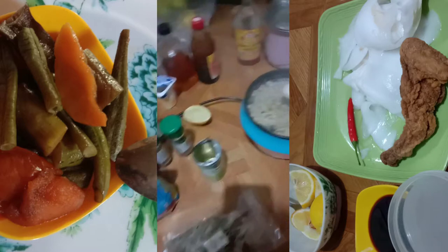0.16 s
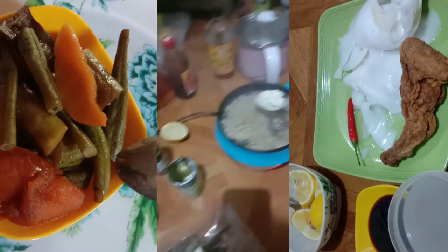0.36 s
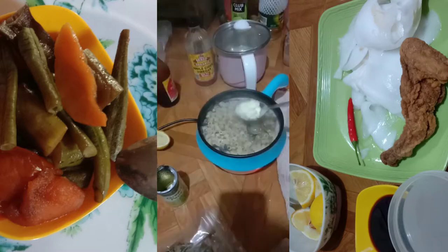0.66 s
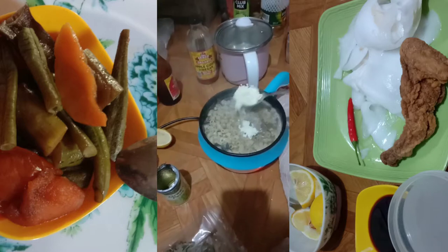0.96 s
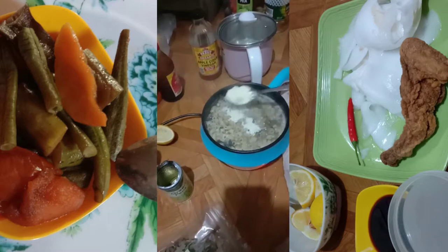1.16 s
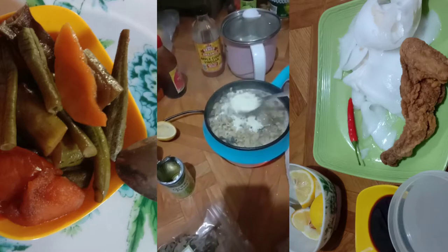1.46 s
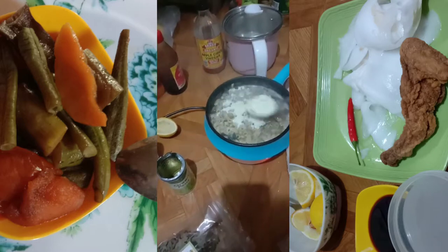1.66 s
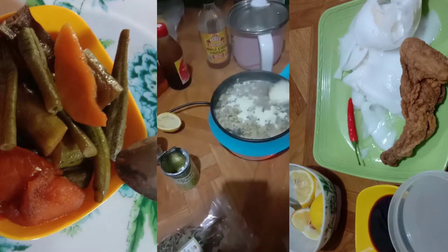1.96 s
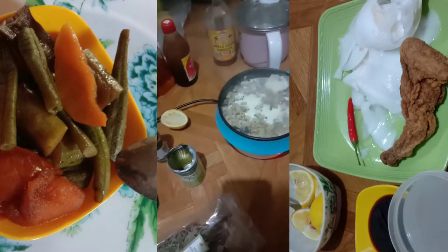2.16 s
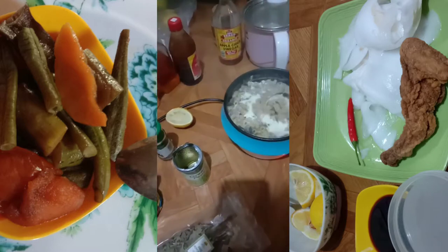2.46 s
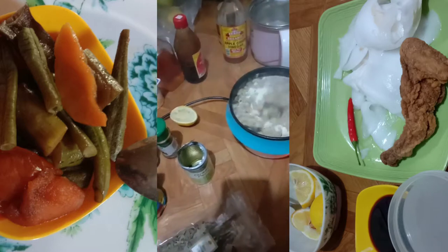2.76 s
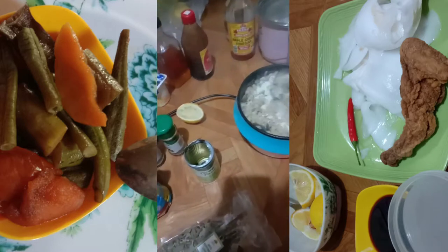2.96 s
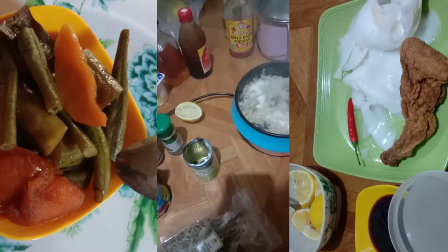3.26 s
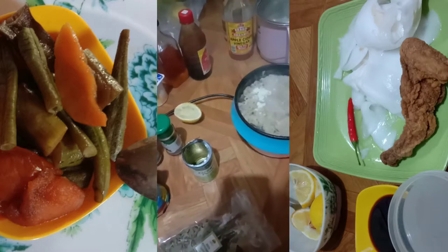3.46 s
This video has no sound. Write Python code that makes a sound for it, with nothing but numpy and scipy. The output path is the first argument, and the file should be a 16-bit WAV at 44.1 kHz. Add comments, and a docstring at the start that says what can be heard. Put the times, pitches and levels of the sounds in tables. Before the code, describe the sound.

Close by in a small kitchen, boiling soup bubbles and spits over a faint fizz. Near the end a spoon clinks against the metal pot two times, the second louder, and the soup keeps bubbling.

```python
"""A thick soup boils in a small metal pot on a kitchen table, heard from close by.
From the start, over a faint hum and a restless fizz, it heaves in short surges: bubbles pop,
froth squelches, droplets spit and big bubbles glug. After about 2.3 seconds the boil eases.
Near 2.7 and 3.2 seconds a spoon knocks on the pot, which rings and thumps the table.
The soup bubbles on to the end, and the small room answers with a short echo."""
import sys
import numpy as np
from scipy import signal
from scipy.fft import rfft, irfft, next_fast_len
from scipy.io import wavfile
from scipy.ndimage import map_coordinates

SR = 44100
rng = np.random.default_rng(int(sys.argv[2]) if len(sys.argv) > 2 else 0)


def inscribe(sig):
    """Save sig as 16-bit PCM at rate SR to the path in sys.argv[1].

    A 1-D sig is mono; a 2-D sig holds one channel per row.
    Samples are clipped to [-1, 1] before scaling.
    """
    pcm = np.round(np.clip(np.atleast_2d(sig).T, -1, 1) * 32767)
    wavfile.write(sys.argv[1], SR, pcm.astype(np.int16))


N = 158760  # 3.6 seconds


def amp(db):
    """Turn decibels (dB) into a factor to multiply by."""
    return 10 ** (np.asarray(db) / 20)


def unit(x):
    """Scale a sound to an average strength (rms) of 1."""
    return x / np.sqrt(np.mean(x ** 2) + 1e-20)


def along(points, hz):
    """Read between (Hz, value) points, with the octaves evenly spaced."""
    freqs, values = np.transpose(points)
    return np.interp(np.log(hz + 1), np.log(freqs + 1), values)


def wobble(rate):
    """A smooth random curve through `rate` points a second."""
    return map_coordinates(rng.standard_normal(4096), [np.arange(N) * rate / SR], mode="wrap")


def add(track, start, sound):
    """Mix a sound in at a start time in seconds."""
    part = track[max(round(start * SR), 0):][:len(sound)]
    part += sound[:len(part)]


def colour(x, points):
    """Turn frequencies up or down along a curve of (Hz, dB) points."""
    size = 2 * next_fast_len(len(x) // 2 + 2048)
    cepstrum = irfft(along(points, np.fft.rfftfreq(size, 1 / SR)) * np.log(10) / 20)
    cepstrum[1:size // 2] *= 2  # folded so that the filter never rings ahead of the sound
    cepstrum[size // 2 + 1:] = 0
    return irfft(rfft(x, size) * np.exp(rfft(cepstrum)))[:len(x)]


def swell(t, length, rise_s, fall_s):
    """A loudness curve that rises, holds until `length` seconds and dies away."""
    return np.minimum(t / rise_s, 1) * np.exp(-np.maximum(t - length, 0) / fall_s)


def grainy(t, depth_db, rate):
    """Noise whose level flickers quickly, so it sounds rough."""
    return rng.standard_normal(len(t)) * amp(depth_db * wobble(rate)[:len(t)])


def blip(t, hz, cycles):
    """A bubble's short ring: loudest after `cycles` waves, climbing in pitch as it bursts."""
    age = t * hz / cycles
    climb = 1 + 0.0045 * np.minimum(age, 10)
    return (age * np.exp(1 - age)) ** 2 * np.sin(2 * np.pi * hz * t * climb)


def ring(t, notes, rise_s, vary_db=0):
    """A struck object rings with several notes; each drops 60 dB in its fade time."""
    out = np.zeros(len(t))
    for k, (hz, db, fade_s) in enumerate(notes):
        loudness = amp(db + vary_db * rng.normal() - 60 * t / fade_s)
        out += (-1) ** k * loudness * np.sin(2 * np.pi * hz * t)
    return out * (1 - np.exp(-t / rise_s))


def widen(x):
    """Left and right sound nearly the same, except in the top treble, where they differ; each microphone hisses
    faintly."""
    # Each row: frequency in Hz, level of the left-right difference in dB.
    width = [(25, -33), (70, -34), (130, -38), (300, -40), (3500, -48.5), (4400, -33), (5400, -24.5),
             (6800, -36), (8500, -9.5), (12000, -9), (15000, -17)]
    # Each row: frequency in Hz, boost or cut of the hiss in dB.
    hiss_tone = [(25, 19), (120, 15), (400, 9), (2000, 15), (6000, 7), (9000, 2.5), (15500, 7)]
    spectrum = signal.stft(x, nperseg=128)[2]
    scrambled = 2 * spectrum * np.exp(2j * np.pi * rng.random(spectrum.shape))
    side = colour(signal.istft(scrambled, nperseg=128)[1][:N], width)
    hiss = np.array([unit(colour(rng.standard_normal(N), hiss_tone)) for _ in range(2)])
    return np.array([x + side, x - side]) + amp(-76.5) * hiss


def kitchen(x):
    """Quick reflections come from the pot wall and the table, then a short echo from the room."""
    # Each row: frequency in Hz, seconds for the room's echo to fade by 60 dB.
    room_fade = [(100, 0.075), (1000, 0.23), (6000, 0.12), (14000, 0.11)]
    early_db, early_fade_s, room_db = -7.5, 0.026, -10
    out, step = np.zeros(N), SR // 5
    for i in range(0, N, step):  # a new random echo for each fifth of a second
        hz, t, noise = signal.stft(rng.standard_normal(SR // 3), SR, nperseg=256)
        tail = signal.istft(noise * amp(-60 * t / along(room_fade, hz)[:, None]), SR, nperseg=256)[1]
        t = np.arange(len(tail)) / SR
        early = rng.standard_normal(len(t)) * amp(-60 * t / early_fade_s) * (t > .001)
        echo = amp(early_db) * early / np.linalg.norm(early) + amp(room_db) * tail / np.linalg.norm(tail)
        add(out, i / SR, signal.fftconvolve(x[i:i + step], echo))
    return x + out


def hum():
    """Faint low tones that waver and burble."""
    # Each row: start and end in seconds, pitch in Hz, level in dB.
    tones = [(0, 3.6, 84.5, -71), (0, 3, 122, -67), (3.2, 3.6, 134.4, -56)]
    out, t = np.zeros(N), np.arange(N) / SR
    for start, end, hz, db in tones:
        fade = np.clip(np.minimum(t - start, end - t) / 0.027 + 1, 0, 1)
        waver = 1.2 + wobble(22) + 1j * wobble(22)  # shakes both loudness and pitch
        out += fade * amp(db) * unit(np.real(waver * np.exp(2j * np.pi * hz * t)))
    return out


def simmer():
    """The soup fizzes in little clusters and rolls with a low rumble; both sink in the lulls."""
    # Each row: time in seconds, fizz level in dB, rumble level in dB.
    strength = [(0, -59.5, -63), (.8, -63, -62.5), (1.5, -59, -63), (2.25, -65, -62), (2.37, -60.5, -67.5),
                (2.5, -64, -66), (2.6, -60, -58), (2.87, -57, -60.5), (2.97, -60.5, -69), (3.11, -59, -72),
                (3.22, -52.5, -65.5), (3.6, -64, -56.5)]
    # Each row of both: frequency in Hz, boost or cut in dB.
    fizz_tone = [(25, -14), (50, -11.5), (85, -5.5), (130, 15), (180, -1.5), (300, -1), (500, -12),
                 (950, -14), (1350, -1.5), (1900, -8), (2700, -15.5), (3500, -10), (4400, -16.5),
                 (5600, -8), (6800, -19), (8200, -37), (13000, -37), (15300, -22)]
    rumble_tone = [(40, -44), (70, 3), (120, -2), (170, 1.5), (280, 2), (400, -3), (520, -16.5),
                   (800, -18.5), (1500, -40)]
    times, *levels = np.transpose(strength)
    fizz_db, rumble_db = [np.interp(np.arange(N) / SR, times, db) for db in levels]
    crackle_db = 3.5 * wobble(330) + 2.5 * wobble(34)  # fine grains, slower clusters
    fizz = unit(colour(rng.standard_normal(N) * amp(crackle_db), fizz_tone))
    rumble = unit(colour(rng.standard_normal(N), rumble_tone))
    return fizz * amp(fizz_db + 0.85 * wobble(6.9)) + rumble * amp(rumble_db + 3.6 * wobble(20))


def spray():
    """Tiny droplets spatter in soft, bright puffs."""
    # Each row: start and length in seconds, level in dB.
    puffs = [(0.162, 0.0071, -50), (1.453, 0.017, -55), (1.666, 0.022, -57.5), (1.821, 0.02, -50.5),
             (1.865, 0.0061, -53), (1.97, .014, -51.5), (2.002, 0.0046, -44.5), (2.04, 0.0064, -54),
             (2.178, 0.0095, -61)]
    # Each row: frequency in Hz, boost or cut in dB.
    tone = [(2000, -23), (3500, 1), (4400, 7), (5500, 4.5), (6800, 10.5), (7400, -9), (8200, -17),
            (13000, -26.5), (15000, -15)]
    out, t = np.zeros(N), np.arange(SR // 12) / SR
    for start, length, db in puffs:
        droplets = unit(colour(grainy(t, depth_db=7.5, rate=590), tone))
        add(out, start, amp(db) * droplets * swell(t, length, rise_s=0.0018, fall_s=0.0039))
    return out


def squelch():
    """Steam and stirring squeeze froth through the thick soup: a short rough hiss round one pitch."""
    # Each row: start and length in seconds, level in dB, centre pitch in Hz.
    squelches = [(0.058, 0.054, -46, 3070), (0.339, 0.0069, -39.5, 3900), (0.398, 0.02, -44, 3480),
                 (0.562, 0.052, -50.5, 2910), (0.704, 0.051, -52.5, 3000), (0.793, 0.013, -61, 3100),
                 (0.896, 0.012, -49.5, 3270), (1.027, 0.11, -56, 3140), (1.14, 0.0071, -36, 3600),
                 (1.225, 0.016, -44, 3170), (1.288, 0.016, -45.5, 3150), (1.397, 0.059, -48, 2860),
                 (1.979, 0.015, -40, 4160), (2.618, 0.01, -39.5, 4660), (2.093, 0.013, -50, 3400),
                 (3.21, 0.019, -48, 3250), (3.394, 0.045, -63, 4800)]
    out, t = np.zeros(N), np.arange(SR // 8) / SR
    octaves = np.linspace(-3, 3, 25)
    band_db = np.maximum(-4 * (octaves / 0.32) ** 2, -45)
    for start, length, db, hz in squelches:
        band = np.transpose([hz * 2 ** octaves, band_db])
        froth = unit(colour(grainy(t, depth_db=7.5, rate=490), band))
        add(out, start, amp(db) * froth * swell(t, length, rise_s=0.0029, fall_s=0.0073))
    return colour(out, [(6800, -2.5), (7900, -30)])


def glugs():
    """Large bubbles heave up from the bottom of the pot, each with a short low note."""
    # Each row: start in seconds, level in dB, pitch in Hz.
    bubbles = [(0.144, -36, 221), (0.221, -35, 298), (0.342, -38, 256), (.402, -34.5, 315),
               (.715, -41.5, 169), (1.013, -38, 283), (1.11, -37.5, 150), (1.502, -38.5, 297),
               (1.572, -38, 260), (1.677, -34, 291), (2.528, -38.5, 231), (2.695, -40, 214),
               (3.254, -42, 128), (3.397, -38, 290), (3.457, -42, 224)]
    out, t = np.zeros(N), np.arange(SR // 8) / SR
    for start, db, hz in bubbles:
        add(out, start, amp(db - 5) * blip(t, hz, cycles=1.97))
    return out


def spoon():
    """A spoon chatters against the pot, which rings and thumps the table; then it briefly scrapes."""
    # Each row: start in seconds, level in dB, brightness (each step tips the tone up by 4 dB),
    # scrape level against the knock in dB, scrape length in seconds.
    knocks = [(2.7329, -14, 1.1, -20, 0.042), (3.1632, -8.5, 2.2, -29.5, 0.021)]
    # The notes of pot and spoon, and of the table. Each row: pitch in Hz, level in dB, fade in seconds.
    pot_notes = [(532, -21.5, 0.052), (1250, -19, 0.046), (1390, -31, .09), (1570, -29, 0.03),
                 (1860, -16.5, 0.021), (1965, -33, 0.073), (2400, -14, 0.021), (2690, -9.5, 0.014),
                 (2970, -29, 0.13), (3430, -6, 0.011), (5310, -10.5, 0.011), (5840, -16.5, 0.01),
                 (6350, -40.5, .085), (6660, -13, 0.0088)]
    table_notes = [(135, -27, 0.05), (226, -27.5, 0.1), (294, -18.5, 0.064), (363, -12, 0.065),
                   (630, -16.5, 0.045), (720, -18.5, 0.022), (882, -20, 0.068)]
    # The spoon's bounces. Each row: seconds after the blow, level in dB.
    chatter = [(0, -6), (.0011, 5), (.0032, -10)]
    # Each row of both: frequency in Hz, boost or cut in dB.
    crack_tone = [(100, -17), (400, -0.5), (2000, 6), (3600, 1.5), (4500, 0), (5500, -19), (7000, -8),
                  (7500, -10.5), (8100, -25.5), (13000, -32.5), (15500, -21)]
    scrape_tone = [(150, -11), (700, -9.5), (1400, 5), (2300, -3.5), (3500, -4.5), (4500, -4.5),
                   (6500, -23), (7300, -17), (8100, -32), (13000, -23.5), (15500, -16)]
    crack_fade_s, dull_fade_s = 0.015, 0.082
    out, t = np.zeros(N), np.arange(SR // 4) / SR
    for start, db, bright, scrape_db, scrape_s in knocks:
        clang = amp(-1.5) * ring(t, pot_notes, rise_s=0.0004, vary_db=1)
        thump = ring(t, table_notes, rise_s=0.001)
        crack = rng.standard_normal(len(t)) * amp(-4.5 - 60 * t / crack_fade_s)
        for delay, bounce_db in chatter:
            add(crack, delay, amp([4 + bounce_db]))
        knock = clang + thump + colour(crack, crack_tone)
        knock = colour(knock, [(375, -2 * bright), (6000, 2 * bright)])
        rub = amp(scrape_db) * grainy(t, depth_db=5, rate=390)
        scrape = colour(rub * swell(t, scrape_s, rise_s=0.0013, fall_s=0.012), scrape_tone)
        dull = colour(scrape, [(6500, -1.5), (9000, -8)])
        scrape = dull + (scrape - dull) * amp(-60 * t / dull_fade_s)  # duller as the spoon slows
        add(out, start, amp(db) * (knock + scrape))
    return colour(out, [(30, -4), (150, 2)])


def pops():
    """Single big bubbles burst, and spatter and spoon make sharp little ticks."""
    # Each row of both: start in seconds, level in dB, pitch in Hz.
    bursts = [(.002,-20.5,1710), (0.0878,-22,2190), (0.137,-24,1900), (0.162,-21,2080), (0.2247,-15.5,1820),
              (0.246,-23,1630), (0.328,-29,1320), (0.3408,-36,1950), (0.401,-24.5,1540), (0.411,-24,2570),
              (0.421,-22,1400), (0.4354,-34,1760), (0.464,-25,1280), (0.4855,-26,1920), (0.5258,-17,1650),
              (0.541,-24,2000), (0.5613,-23,1680), (0.5903,-29,2300), (0.5994,-34,1790), (0.614,-23,1180),
              (0.7056,-22.5,1620), (0.7185,-23,1560), (0.7479,-18.5,3020), (0.7895,-18.5,1610),
              (0.893,-22.5,1600), (0.954,-34,1530), (1.0126,-21.5,1466), (1.0509,-23.5,2120),
              (1.19,-40,1330), (1.2073,-21.5,1590), (1.2553,-20,1880), (1.295,-31.5,1980),
              (1.3247,-20,1470), (1.341,-26,1330), (1.3881,-21,1850), (1.402,-16,1584), (1.5552,-23.5,1720),
              (1.6771,-23.5,1500), (1.6856,-17.5,1640), (1.7495,-36,1700), (1.856,-28,1430),
              (1.8915,-23.5,1420), (1.928,-20,1750), (1.9428,-24,1730), (1.9942,-36,1810), (2.012,-26,1440),
              (2.181,-16,3960), (2.1914,-20,1570), (2.231,-23,1530), (2.31,-71,1700), (2.424,-30.5,1435),
              (2.669,-26,1370), (2.859,-25.5,1610), (3.2966,-23.5,1630), (3.313,-33,1700),
              (3.4032,-24.5,1250)]
    ticks = [(0.1708,-25.5,5930), (0.3474,-52,5200), (0.7278,-27.5,5950), (.7452,-37,6000),
             (.7897,-40,5300), (1.1368,-37,5570), (1.1412,-34,5400), (1.4386,-29,5400), (1.5841,-26.5,5500),
             (1.9949,-28.5,5350), (2.0545,-31,4640), (2.182,-44,4540), (2.249,-26,5010), (2.7647,-34,5470),
             (2.7815,-25,6500), (2.822,-33,5450), (3.148,-31,5450), (3.1528,-27.5,5900), (3.2487,-30,4500),
             (3.2573,-29,5700), (3.296,-35,5300), (3.314,-50,4800), (3.3444,-36,5500), (3.39,-28,4900),
             (3.4061,-37,5060), (3.462,-22.5,5870)]
    snap_fade_s = 0.0015
    big, small, snaps = np.zeros((3, N))
    t = np.arange(SR // 50) / SR
    for start, db, hz in bursts:
        add(big, start, amp(db - 4.5) * blip(t, hz, cycles=0.87))
        add(big, start, amp(db - 20) * blip(t, hz * 0.903, cycles=2.9))  # the open hollow rings on
    for start, db, hz in ticks:
        add(small, start, amp(db + 1.5) * blip(t, hz, cycles=1.47))
        add(snaps, start, amp(db - 28 - 60 * t / snap_fade_s) * rng.standard_normal(len(t)))
    big = colour(big, [(200, -7), (900, -7), (1300, -0.5), (3500, -2), (5000, -2.5)])
    return colour(big + small, [(6900, 0), (8000, -20)]) + snaps


def swarm(kind, tone, rate, hz, spread, cycles, size_db, froth_db):
    """One kind of bubble in every surge: `rate` random blips a second over a little froth noise."""
    # Each row: start and length in seconds, then popping, spitting and glugging levels in dB.
    surges = [(0, 0.03, -49, -58.5, -59), (0.06, 0.081, -49.5, -68, -57.5), (0.135, 0.061, -43, -62, -53),
              (0.216, 0.042, -45, -55, -54.5), (0.329, 0.032, -43.5, -61, -54),
              (0.395, 0.04, -40.5, -58, -53), (0.453, 0.046, -45, -63, -52.5),
              (0.523, 0.027, -41.5, -99, -63), (0.564, 0.058, -42, -59.5, -55),
              (0.64, 0.049, -49, -89, -62), (0.697, 0.055, -41.5, -64, -52), (0.77, 0.034, -45, -56, -51.5),
              (0.828, 0.043, -45.5, -60, -57), (0.886, 0.033, -47.5, -67, -66),
              (0.946, 0.021, -44, -56, -55.5), (0.987, 0.076, -46, -60.5, -54.5),
              (1.103, 0.043, -45, -55.5, -54), (1.187, 0.07, -43, -61.5, -53.5),
              (1.284, 0.018, -38.5, -63.5, -50), (1.324, 0.029, -42.5, -62.5, -62),
              (1.382, 0.066, -48, -54.5, -64), (1.486, 0.046, -44.5, -66.5, -53),
              (1.547, 0.064, -47.5, -65, -54), (1.625, 0.039, -47.5, -82, -56),
              (1.667, 0.031, -43, -59, -51), (1.739, 0.066, -43, -64.5, -53),
              (1.825, 0.017, -45, -62, -47.5), (1.873, 0.09, -48, -58, -57),
              (1.972, 0.056, -46.5, -55, -57), (2.039, 0.064, -45.5, -53.5, -53),
              (2.123, 0.043, -49.5, -52.5, -54), (2.17, 0.025, -44, -55, -65),
              (2.214, 0.063, -47.5, -60, -55.5), (2.279, 0.049, -48.5, -80, -64),
              (2.378, 0.038, -57.5, -88, -56), (2.42, 0.059, -54, -65.5, -61.5),
              (2.52, 0.032, -50.5, -64, -59), (2.567, 0.068, -51, -55.5, -52.5),
              (2.663, 0.051, -51.5, -59, -54.5), (2.74, 0.039, -49, -50, -65),
              (2.829, 0.043, -49, -57.5, -55), (2.887, 0.023, -53, -65, -59),
              (3.039, 0.02, -56, -61.5, -57), (3.147, 0.02, -47, -67, -53), (3.212, 0.056, -49, -61, -51),
              (3.298, 0.065, -56.5, -54, -64.5), (3.379, 0.035, -44.5, -44.5, -63),
              (3.448, 0.026, -45, -50.5, -52), (3.489, 0.046, -50.5, -55.5, -65),
              (3.563, 0.024, -51.5, -65, -59.5)]
    rise_s, fall_s, vigorous_db = 0.006, 0.014, -43
    out, ring_t = np.zeros(N), np.arange(int(10 * cycles / hz * SR)) / SR
    for start, length, pop_db, spit_db, glug_db in surges:
        db = {"pop": pop_db, "spit": spit_db, "glug": glug_db}[kind]
        t = np.arange(int((length + rise_s + 4 * fall_s) * SR)) / SR
        when, size, height, flip = rng.random((4, max(int(rate * t[-1]), 2)))
        height = np.clip(height, .02, .98)
        pitches = hz * (height / (1 - height)) ** spread  # most lie near hz
        gains = np.sign(2 * flip - 1) * amp(size_db * size ** 2)  # a few are much louder
        bubbles = np.zeros(len(t))
        for onset, gain, pitch in zip(when * t[-1], gains, pitches):
            add(bubbles, onset, gain * blip(ring_t, pitch, cycles))
        froth = signal.fftconvolve(rng.standard_normal(len(t)), blip(ring_t, hz, cycles / 2), "same")
        surge = unit(bubbles) + amp(froth_db) * unit(froth)
        surge = colour(surge * swell(t, length, rise_s, fall_s), tone)
        if kind == "pop":  # a weak surge loses its crisp top
            surge = colour(surge, [(2100, 0), (3200, 1.2 * np.clip(db - vigorous_db, -10, 2))])
        add(out, start - rise_s / 2, amp(db) * np.sqrt(length / t[-1]) * unit(surge))
    return out


def boil():
    """Every surge pops and plinks at middle pitch, spits up high and glugs down low."""
    # Each row of all three: frequency in Hz, boost or cut in dB.
    pop_tone = [(200, -19.5), (500, 7.5), (600, -5.5), (850, 1), (970, -1.5), (1250, 2.5), (1700, 4.5),
                (2300, -0.5), (2850, 1.5), (3450, 8.5), (4100, -13), (7000, -37), (8200, -32)]
    spit_tone = [(1500, 5), (3500, 13), (4400, -1), (5500, 4), (6200, -5.5), (6800, -4.5), (7300, -9),
                 (7900, -18), (13000, 13), (15300, -19)]
    glug_tone = [(25, -21), (55, -24.5), (120, -5), (190, -8.5), (300, 0.5), (380, -2), (470, -9.5),
                 (900, 3.5), (2000, -26)]
    pop = swarm("pop", pop_tone, rate=600, hz=1579, spread=.19, cycles=.892, size_db=16, froth_db=-10)
    plink = swarm("pop", pop_tone, rate=200, hz=1471, spread=.145, cycles=2.4, size_db=3.5, froth_db=-4)
    spit = swarm("spit", spit_tone, rate=430, hz=5696, spread=.11, cycles=1.41,
                 size_db=19, froth_db=-10.5)
    spit = colour(spit, [(7000, 0), (8500, -12), (15500, -18)])
    glug = swarm("glug", glug_tone, rate=150, hz=225.2, spread=.292, cycles=1.1,
                 size_db=10.5, froth_db=-5.5)
    return amp(-2) * pop + amp(-9) * plink + amp(0.5) * (spit + glug)


def scene():
    """The pot's open mouth colours bubbles and spoon, the kitchen echoes them; simmer and hum join."""
    # How the mouth resonates. Each row: frequency in Hz, boost or cut in dB.
    mouth = [(300, 0), (500, 0), (720, 4.5), (850, -0.5), (970, -2.5), (1200, 3), (1700, -0.5), (2300, 1.5),
             (2850, -1.5), (3500, 2.5), (4200, -3.5), (4900, -2.5), (5550, 0.5), (6150, 0.5), (6700, -0.5),
             (7400, 0), (9000, 3)]
    pot = colour(boil() + squelch() + spray() + glugs() + pops() + spoon(), mouth)
    return widen(kitchen(pot) + simmer() + hum())


def record(dry):
    """Cut away everything above 15800 Hz."""
    size = next_fast_len(N + SR // 2)
    kept = np.fft.rfftfreq(size, 1 / SR) < 15800
    return irfft(rfft(dry, size) * kept, size)[:, :N]


dry = scene()
out = record(dry)
inscribe(out)
```